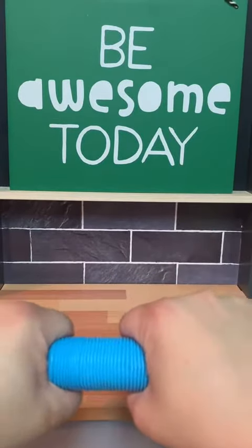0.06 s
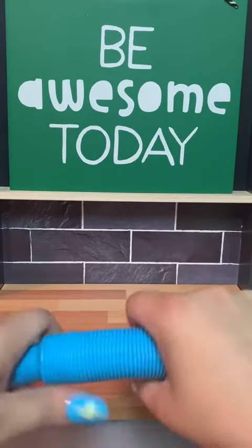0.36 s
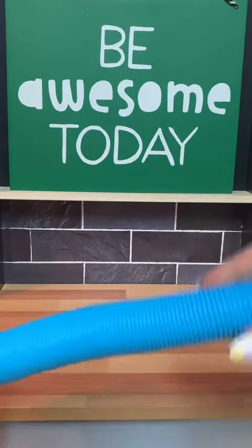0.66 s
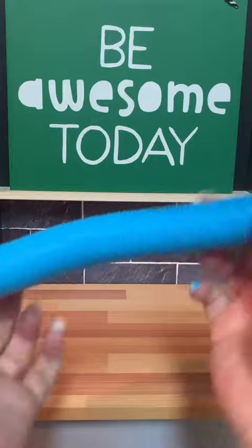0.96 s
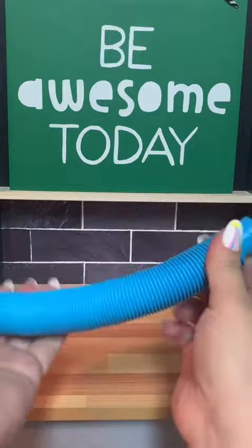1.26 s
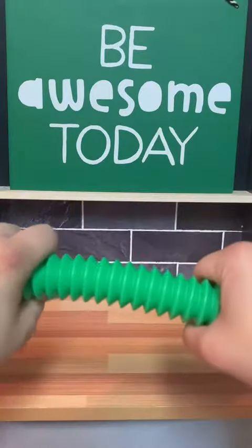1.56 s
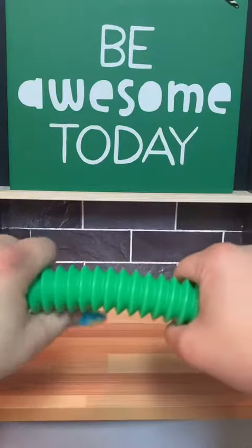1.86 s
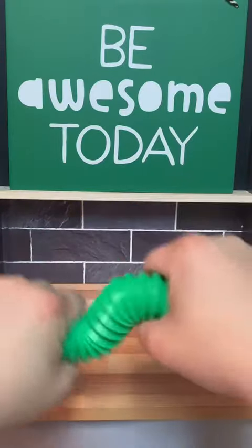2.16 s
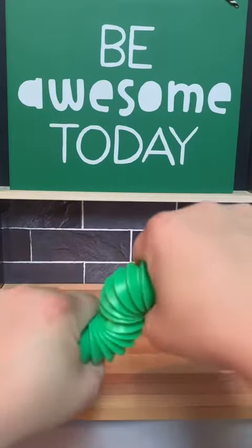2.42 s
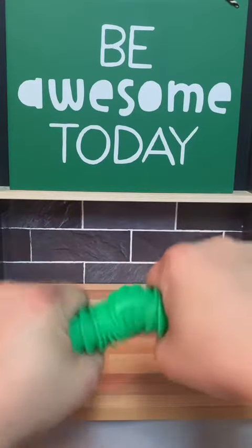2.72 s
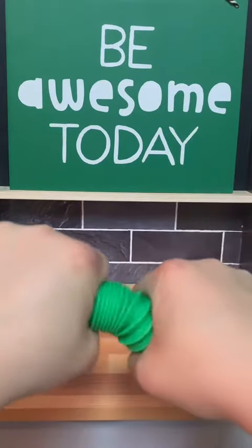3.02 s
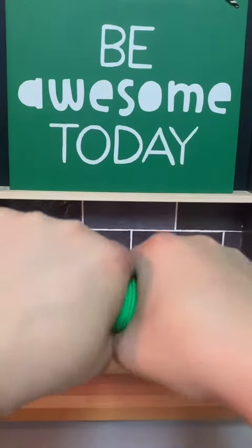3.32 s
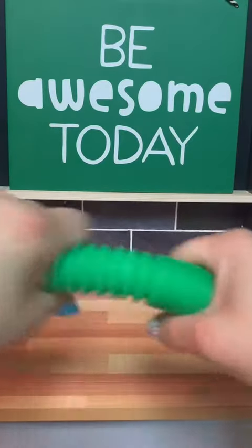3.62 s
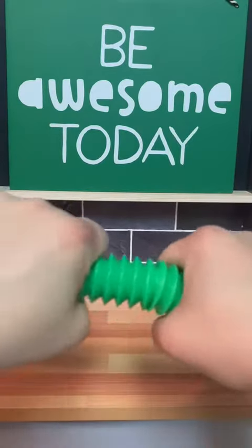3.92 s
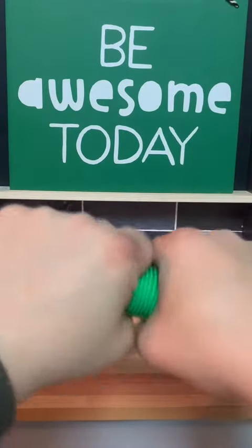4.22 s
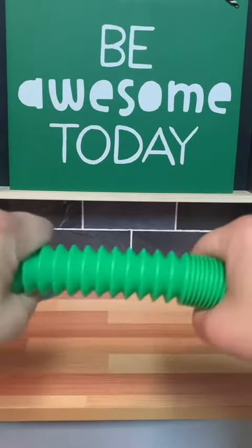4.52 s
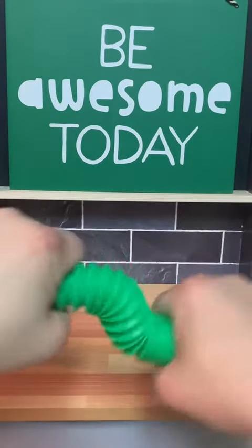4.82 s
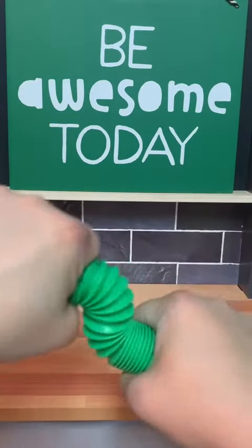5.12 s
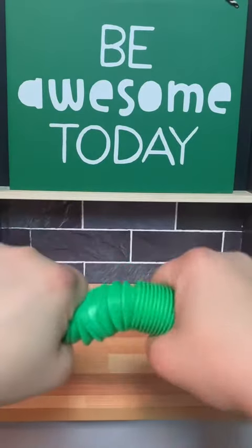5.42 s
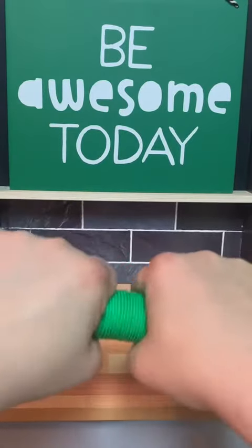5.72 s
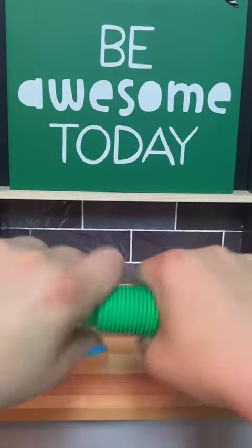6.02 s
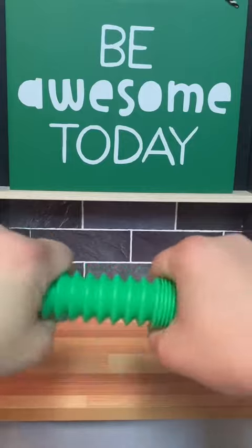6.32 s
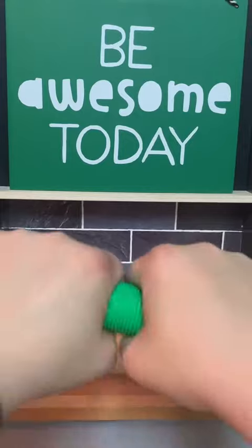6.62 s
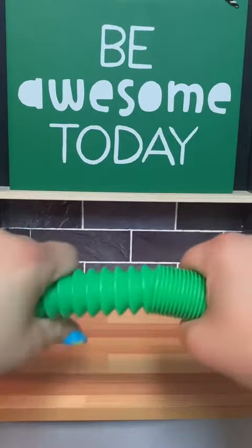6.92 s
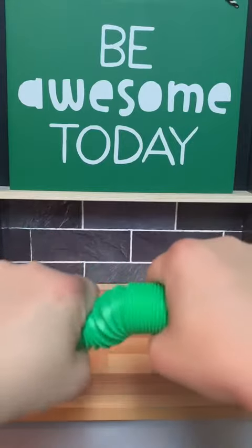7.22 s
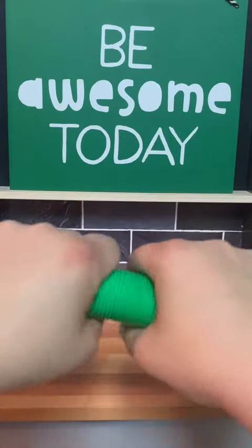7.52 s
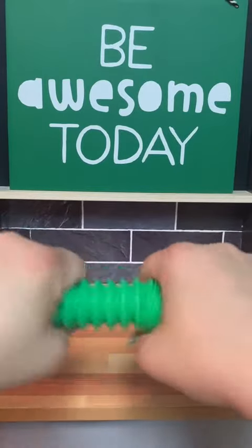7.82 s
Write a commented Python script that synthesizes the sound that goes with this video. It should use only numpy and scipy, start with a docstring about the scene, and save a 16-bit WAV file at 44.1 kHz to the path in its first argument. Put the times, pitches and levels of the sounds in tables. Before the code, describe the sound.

Hands pull and squash a ribbed plastic tube again and again, its soft zipping alternating with loud crackling snaps.

```python
"""Pop tubes, pulled and squeezed

Corrugated plastic tubes are worked by hand, close to a phone in a small, softly rumbling room.
Pulling gives a faint, ticking rasp. Squeezing flips the ribs one by one, each with a snap that races
through the wall as a bending wave and rings the air inside. The air note climbs as the tube shortens."""
import sys
import numpy as np
from scipy import signal
from scipy.fft import rfft, irfft, next_fast_len
from scipy.io import wavfile
from scipy.ndimage import uniform_filter1d

SR = 44100
rng = np.random.default_rng(int(sys.argv[2]) if len(sys.argv) > 2 else 0)


def dump(signal):
    """Clip the signal to [-1, 1] and save it as 16-bit WAV at the path in sys.argv[1]."""
    limited = np.clip(np.atleast_2d(signal).T, -1, 1)
    pcm = np.round(limited * 32767).astype(np.int16)
    wavfile.write(sys.argv[1], SR, pcm)


N = 355887
TIME = np.arange(N) / SR
LONG_TUBE_START_S, LONG_TUBE_END_S = 0.3, 1.2

# pulls and rubs that drag the ribs over each other: start_s, end_s, hiss_db, wall_db
PULL_STROKES = [(0, 0.036, -69, -56.5), (0.362, 0.615, -61.5, -65), (0.681, 0.771, -72, -67.5),
                (0.853, 1.084, -73, -74.5), (1.389, 1.523, -50, -67.5), (1.595, 1.697, -60, -70.5),
                (1.755, 1.898, -55.5, -69), (2.339, 2.362, -82, -50), (2.587, 2.74, -82, -57.5),
                (3.17, 3.42, -71.5, -74.5), (3.528, 3.68, -42, -49.5), (3.71, 3.783, -43.5, -49),
                (4.298, 4.478, -43.5, -54.5), (5.917, 6.015, -51, -49), (6.001, 6.157, -45, -54.5),
                (6.212, 6.301, -49.5, -53.5), (6.788, 6.872, -55.5, -55), (6.863, 6.991, -57, -62),
                (7.513, 7.717, -51, -58.5), (7.768, 7.857, -46, -53)]
# single ribs ticking open: start_s, crack_db, air_kick_db
OPENING_RIBS = [(0.294, -53.5, -85), (0.966, -63.5, -62.5), (1.0338, -64.5, -71), (3.308, -57.5, -80.5),
                (3.3813, -58.5, -79), (3.4574, -51.5, -70), (3.5589, -37, -43), (4.3433, -36.5, -52),
                (5.9472, -42, -39.5), (6.0632, -37.5, -46), (6.2435, -48.5, -46), (6.298, -42.5, -70),
                (6.8181, -40.5, -70), (6.8425, -32, -39), (7.6169, -40, -52), (7.7718, -46, -47.5),
                (7.8093, -46, -35.5)]
# ribs snapping shut: start_s, wall_db, centre_hz, air_kick_db
CLOSING_RIBS = [(2.089, -24, 2330, -41.5), (2.1036, -17.5, 2260, -21.5), (2.118, -18.5, 1450, -25.5),
                (2.1335, -16.5, 1160, -17.5), (2.155, -21.5, 1045, -15.5), (2.1767, -28, 1290, -19),
                (2.3736, -24.5, 890, -23.5), (2.5666, -39.5, 944, -34.5), (2.7062, -17, 2330, -26),
                (2.7278, -20, 2030, -46), (2.741, -21, 2070, -36.5), (2.7958, -17.5, 2340, -35.5),
                (2.8944, -23, 1990, -27), (2.9108, -18, 1775, -24.5), (3.0316, -18, 2200, -33.5),
                (3.0433, -21, 2560, -38), (3.0644, -22, 3630, -42), (3.0782, -27, 2440, -42),
                (3.098, -26.5, 1960, -35), (3.528, -31, 907, -33), (3.9501, -28.5, 1310, -28),
                (3.9731, -21.5, 1660, -26.5), (3.9842, -16, 1420, -26.5), (3.9966, -19.5, 1130, -35),
                (4.0018, -21.5, 1840, -40.5), (4.0159, -20.5, 1890, -34), (4.0279, -20, 2470, -45.5),
                (4.063, -20.5, 2430, -38.5), (4.071, -27, 2430, -43), (4.0862, -20.5, 3100, -46),
                (4.0905, -23.5, 2710, -42.5), (4.0987, -23, 2510, -34), (4.1028, -18.5, 2540, -41),
                (4.112, -29, 2060, -32), (4.7638, -21, 3560, -27.5), (4.7746, -22, 1600, -20.5),
                (4.7889, -16.5, 1330, -24), (4.8, -19, 1630, -15), (4.8089, -18.5, 1370, -19.5),
                (4.8209, -19, 1090, -14), (4.8282, -16.5, 1220, -20.5), (4.847, -19.5, 1040, -17),
                (4.8644, -22, 990, -28.5), (4.8714, -22.5, 830, -19), (5.219, -18.5, 1640, -22),
                (5.2493, -18, 2410, -20), (5.4452, -22.5, 980, -19), (5.5412, -19, 2694, -23),
                (5.6345, -21, 2600, -27.5), (5.652, -25, 2430, -31), (5.6617, -19.5, 2920, -32.5),
                (5.6726, -19, 1250, -41), (5.683, -23, 2520, -39), (6.4311, -21, 2260, -26),
                (6.4576, -19, 2010, -31.5), (6.47, -20.5, 2400, -25.5), (6.4806, -23.5, 2200, -22),
                (6.4871, -21.5, 2190, -28), (6.4974, -21.5, 1480, -20.5), (6.5285, -27.5, 1910, -35.5),
                (6.542, -27.5, 2800, -53.5), (6.555, -25, 2340, -41.5), (6.559, -19.5, 3060, -44.5),
                (6.576, -26, 2380, -47), (6.5828, -20, 2780, -42.5), (6.6031, -27, 2850, -36),
                (7.0737, -24.5, 3180, -31.5), (7.0974, -24.5, 1740, -30.5), (7.103, -34.5, 1940, -25),
                (7.2328, -23, 1865, -23), (7.2864, -33, 2760, -42), (7.291, -20.5, 2800, -37),
                (7.303, -30, 2610, -38), (7.312, -20.5, 2830, -35), (7.321, -23, 2340, -42),
                (7.329, -33, 2270, -32), (7.9161, -32, 1700, -29), (7.921, -23, 2110, -28.5),
                (7.9297, -20, 1600, -24), (7.9371, -19, 2070, -17.5), (7.9495, -22.5, 2980, -53),
                (7.9654, -22.5, 2940, -30), (7.9784, -31, 2960, -42)]
# ring-out of the plastic wall: freq_hz, t60_s
WALL_DECAY = [(300, 0.62), (1000, 0.094), (2500, 0.44), (6000, 0.067), (15000, 0.16)]
# fundamental of the air in the short tube: time_s, pitch_hz
AIR_PITCH = [(2.1, 212.3), (2.92, 221.4), (3.12, 232), (3.55, 249.2), (3.95, 243.5), (4.04, 270),
             (4.8, 287.5), (5.3, 293.5), (5.58, 300.3), (5.7, 313.2), (6.43, 306.7), (6.52, 348.2),
             (6.87, 335.4), (7.12, 358.7), (7.26, 365.4), (7.34, 398), (7.92, 380.6), (7.98, 425.3)]


def undb(db):
    """Decibels to gain."""
    return 10 ** (np.asarray(db) / 20)


def lookup(points, hz):
    """Read a table of freq_hz, value on a log-frequency axis."""
    f, value = np.transpose(points)
    return np.interp(np.log(np.maximum(hz, 1)), np.log(f), value)


def freqs(x):
    """Bin frequencies of the spectrum of x."""
    return np.fft.rfftfreq(x.shape[-1], 1 / SR)


def colour(x, points):
    """Minimum-phase EQ from a table of freq_hz, gain_db."""
    size = next_fast_len(x.shape[-1] + 2048) * 2
    gain = undb(lookup(points, np.fft.rfftfreq(size, 1 / SR)))
    cepstrum = irfft(np.log(gain))
    cepstrum[1:size // 2] *= 2
    cepstrum[size // 2 + 1:] = 0
    return irfft(rfft(x, size) * np.exp(rfft(cepstrum)))[..., :x.shape[-1]]


def unit(x):
    """Scale to rms 1."""
    return x / np.sqrt(np.mean(x ** 2))


def strike(x, db):
    """Scale a hit so that its first 6 ms have this rms level."""
    return x * undb(db) / np.sqrt(np.mean(x[..., :int(.006 * SR)] ** 2))


def stereo_noise(size, width):
    """White noise, mono at width 0 and fully wide at 1."""
    mid, side = rng.standard_normal((2, size))
    return unit(mid + width * side * np.array([[1], [-1]]))


def ring_out(noise, t60s):
    """Let each octave of a noise fade with its own decay time."""
    t, spectrum = np.arange(noise.shape[-1]) / SR, rfft(noise)
    centres = 125 * 2. ** np.arange(8)
    shares = [lookup(np.c_[centres, band], freqs(noise)) for band in np.eye(len(centres))]
    fades = [1000 ** (-t / lookup(t60s, hz)) for hz in centres]
    return sum(irfft(spectrum * share) * fade for share, fade in zip(shares, fades))


def add(out, x, start_s):
    """Mix x into out from start_s on."""
    i = int(start_s * SR)
    first, last = max(i, 0), min(i + x.shape[-1], out.shape[-1])
    out[..., first:last] += x[..., first - i:last - i]


def room_tone(rumble_trim_db=-0.5, hiss_db=-88):
    """A low, nearly mono rumble under a trace of hiss."""
    # spectrum of the rumble: freq_hz, gain_db
    rumble_eq = [(12, -44), (20, -12), (59, 4), (97, -1.5), (116, -9.5), (178, -17.5), (251, -18.5),
                 (333, -29.5), (435, -33), (536, -48.5), (700, -48), (910, -80.5), (1540, -120)]
    # its rise and fall: time_s, level_db
    rumble_ride = [(0.0, -56.5), (1.47, -53), (1.63, -48.5), (2.63, -50.5), (6.44, -48.5), (6.46, -54.5),
                   (7.4, -53), (8.0, -51.5)]
    level_db = np.interp(TIME, *np.transpose(rumble_ride)) + rumble_trim_db
    rumble = unit(colour(stereo_noise(N, 0.045), rumble_eq))
    return undb(level_db) * rumble + undb(hiss_db) * stereo_noise(N, 0.2)


def wall_ripple(f, spacing_hz, depth_db):
    """Random peaks and dips: the wall's resonances shift with every bend and grip."""
    knots = np.arange(0, SR, 250) * spacing_hz / 250
    return undb(depth_db * np.interp(f, knots, rng.standard_normal(len(knots))))


def rasps(edge_s=0.036, swell_db=2, swell_s=0.015, slip_db=2.5, slip_s=0.0012, size=16384):
    """Ribs scraping open in a dense, uneven run of tiny slips; every stroke has its own resonances."""
    # body of the scraped wall: freq_hz, gain_db
    wall_eq = [(200, -6.5), (600, -5), (1000, -10), (1800, -2.5), (3400, 0), (5000, -14), (8000, -18)]
    # friction hiss on top: freq_hz, gain_db
    hiss_eq = [(2500, -23.5), (4500, -12.5), (6000, -6), (8000, -8), (9500, -9), (11800, 1.5),
               (14000, -2.5), (16000, -7)]
    out = np.zeros((2, N))
    t = np.arange(size) / SR - .03  # pre-roll for the fade-in
    for start, end, hiss_db, wall_db in PULL_STROKES:
        length = end - start
        ramp = np.minimum(t, length - t) / min(edge_s, length / 3)
        stroke = np.clip(ramp / 2 + .5, 0, 1) ** 2
        grain = unit(uniform_filter1d(rng.standard_normal(size), int(slip_s * SR)))
        swell = unit(uniform_filter1d(rng.standard_normal(size), int(swell_s * SR)))
        slips = undb(slip_db * grain + swell_db * swell)
        for eq, db, width in (wall_eq, wall_db, .3), (hiss_eq, hiss_db, .8):
            layer = colour(slips * stereo_noise(size, width), eq)
            layer = irfft(rfft(layer) * wall_ripple(freqs(layer), spacing_hz=300, depth_db=3))
            add(out, undb(db) * stroke * unit(layer), start + t[0])
    return out


def crack(click=1.1, ring_db=-19, size=3072):
    """The sharp top of a flip: a click and a short spray of creases, coloured anew by each rib."""
    # average tone of the crack: freq_hz, gain_db
    crack_eq = [(2500, -19.5), (4600, -4.5), (5500, -2), (7500, -3.5), (9500, -9.5), (13000, -5.5),
                (16000, -6)]
    t = np.arange(size) / SR
    spray = stereo_noise(size, .7) * np.exp(-t / .004)
    spray += undb(ring_db) * ring_out(stereo_noise(size, 0.25), WALL_DECAY)
    spray[:, int(.0005 * SR)] += click
    hz = np.linspace(2500, 16000, 32)
    gain_db = lookup(crack_eq, hz) + 4 * rng.standard_normal(len(hz))
    return colour(spray, np.c_[hz, gain_db])


def ticks(wall_hz=2670, wall_trim_db=-7, loose_db=-2, scatter_db=3, per_pull=4):
    """Ribs ticking open, barely moving the wall: distinct ones, and a few at random in every pull."""
    out = np.zeros((2, N))
    for start, crack_db, _ in OPENING_RIBS:
        wall = strike(wall_wave(wall_hz, size=2048), crack_db + wall_trim_db)
        add(out, wall + strike(crack(size=2048), crack_db), start)
    for start, end, hiss_db, _ in PULL_STROKES:
        tick = strike(crack(size=1024), hiss_db + loose_db)
        for place, accent in zip(rng.random(per_pull), rng.standard_normal(per_pull)):
            add(out, undb(scatter_db * accent) * tick, start + (end - start) * place)
    return out


def rib_modes(centre_hz, t, count=4, t60_s=0.028):
    """A few short rings of the flipped rib, scattered around the wall's centre frequency."""
    hz = np.minimum(centre_hz * np.exp(.35 * rng.standard_normal((count, 1))), SR / 4)
    rings = np.sin(2 * np.pi * hz * t + rng.uniform(0, 2 * np.pi, (count, 1)))
    return unit(rings.sum(axis=0)) * 1000 ** (-t / t60_s)


def wall_wave(centre_hz, sweep_s=0.001806, q=0.64, low_hz=310, ring_db=-39, size=3072):
    """The body of a flip: a pulse and the wall's ring, spread into a falling chirp."""
    t = np.arange(size) / SR
    push = undb(-20) * stereo_noise(size, .2) * np.exp(-t / .0028)  # scatter among the ribs
    push += undb(-34) * rib_modes(centre_hz, t)
    push += undb(ring_db) * ring_out(stereo_noise(size, 0.13), WALL_DECAY)
    push[:, 0] += 1  # the pulse itself
    f = freqs(push) + 1
    body = wall_ripple(f, spacing_hz=260, depth_db=3.5) / (1 + 1j * q * (f / centre_hz - centre_hz / f))
    top_hz = min(4300, 3.1 * centre_hz)  # a soft, low flip has less treble too
    body /= np.sqrt(1 + (f / top_hz) ** 10) * np.sqrt(1 + (low_hz / f) ** 4)
    # bending waves speed up with the root of frequency, so the lows arrive late
    lag = np.exp(-4j * np.pi * sweep_s * np.sqrt(1000 * f) + 2j * np.pi * f * sweep_s / 4)
    fade_out = np.minimum(1, 4 - 4 * t / t[-1]) ** 2
    return irfft(rfft(push) * body * lag) * fade_out


def air_column(rasp, rub_db=-31, t60_s=0.22, damping=0.63, stretch=1.02, scatter_db=2, count=7):
    """Flips kick and rubbing stirs the air inside; its stretched harmonics follow the tube's length."""
    # how strongly the air modes reach out of the tube: freq_hz, gain_db
    radiation_eq = [(210, -11.5), (260, 0.5), (300, -0.5), (360, 3), (430, -0.5), (600, -5.5), (750, -7),
                    (950, -19), (1200, -12), (2200, -15.5)]
    pitch_hz = np.interp(TIME, *np.transpose(AIR_PITCH))
    phase = 2 * np.pi * np.cumsum(pitch_hz) / SR
    start_s, kick_db = np.transpose([(rib[0], rib[-1]) for rib in CLOSING_RIBS + OPENING_RIBS])
    onsets = (start_s * SR).astype(int)
    # pulled far out, the open ribs soak up part of the kick
    kick_db = kick_db + np.interp(pitch_hz[onsets], [215, 260], [-2, 0])
    # a rib's place along the tube decides how well it drives each overtone
    coupling = rng.standard_normal((len(onsets), count))
    out = np.zeros(N)
    for k in range(1, count + 1):
        drive = undb(rub_db) * rasp / k ** 2
        drive[onsets] += undb(kick_db + scatter_db * coupling[:, k - 1] * np.log(k))
        carrier = np.exp(1j * phase * k ** stretch)
        feedback = np.exp(-np.log(1000) * k ** damping / (t60_s * SR))  # overtones die sooner
        ring = carrier * signal.lfilter([1], [1, -feedback], drive / carrier)  # gliding resonator
        out += ring.imag * undb(lookup(radiation_eq, pitch_hz * k ** stretch))
    # the air note carries little bass below about 235 Hz
    return signal.sosfilt(signal.butter(2, 235, "high", fs=SR, output="sos"), out)


def long_tube(rasp, hollow_band_hz=(545, 655), hollow_db=6, sizzle_hz=10500, sizzle_db=3):
    """Pulled long, the first tube adds a hollow resonance and the sizzle of its fine ribs to the rasp."""
    rub = rasp * (TIME > LONG_TUBE_START_S) * (TIME < LONG_TUBE_END_S)
    hollow = signal.sosfilt(signal.butter(2, hollow_band_hz, "band", fs=SR, output="sos"), rub)
    sizzle = signal.sosfilt(signal.butter(2, sizzle_hz, "high", fs=SR, output="sos"), rub)
    return undb(hollow_db) * hollow + undb(sizzle_db) * sizzle


def snaps(crack_trim_db=-6, rebound_db=-13, rebound_range_s=(0.002, 0.008)):
    """Every rib that snaps shut, and its weaker rebound a moment later."""
    out = np.zeros((2, N))
    for start, wall_db, centre_hz, _ in CLOSING_RIBS:
        air_hz = np.interp(start, *np.transpose(AIR_PITCH))
        stiff_db = 6 * np.log2(centre_hz / 2000)  # a stiffer, higher rib cracks harder
        packed_db = 5 * np.log2(air_hz / 300)  # and so does a tightly packed tube
        crack_db = wall_db + crack_trim_db + stiff_db + packed_db
        snap = strike(wall_wave(centre_hz), wall_db) + strike(crack(), crack_db)
        add(out, snap, start)
        add(out, undb(rebound_db) * snap, start + rng.uniform(*rebound_range_s))
    return out


def room_reverb(x, early_db=-13, early_decay_s=0.0098, late_db=-23, size=16384):
    """Quick reflections from the table and backboard, then the faint tail of the room."""
    # tone of the reflections: freq_hz, gain_db
    room_eq = [(100, -2.5), (300, 9.5), (700, 10), (1500, 9), (4000, 1), (8000, 2.5), (15000, -11)]
    # length of the tail: freq_hz, t60_s
    room_decay = [(200, 0.3), (1000, 0.3), (4000, 0.33), (15000, 0.45)]
    t = np.arange(size) / SR
    early = stereo_noise(size, 0.34) * np.exp(-t / early_decay_s) * (t > .002)
    late = ring_out(stereo_noise(size, 1.0), room_decay) * (t > .01)
    response = colour(undb(early_db) * unit(early) + undb(late_db) * unit(late), room_eq) / np.sqrt(size)
    return signal.fftconvolve(x[None], response, axes=1)[:, :N]


def stereo_spread(x):
    """The two microphone ports agree more in some bands than in others."""
    # stereo width by band: freq_hz, side_gain_db
    side_eq = [(100, 6), (250, -2.5), (550, 3), (1000, 3.5), (2000, 2), (4200, -6.5), (8000, -4),
               (13000, 1.5)]
    mid, side = x.mean(axis=0), (x[0] - x[1]) / 2
    return mid + colour(side, side_eq) * np.array([[1], [-1]])


def scene():
    """The tubes in their room: rubbing sounds the long tube's hollow and the short tube's air note."""
    rasp = rasps()
    short_tube_rasp = rasp.mean(axis=0) * (TIME >= LONG_TUBE_END_S)
    tubes = snaps() + ticks() + rasp + long_tube(rasp) + air_column(short_tube_rasp)
    return stereo_spread(tubes + room_reverb(tubes.mean(axis=0))) + room_tone()


def record(dry):
    """The phone colours the sound, clips at full scale and cuts the top."""
    # microphone response: freq_hz, gain_db
    mic_eq = [(30, -6), (80, 3), (750, 3.5), (1000, 0.5), (2400, -0.5), (4200, 4.5), (4650, -5), (4950, -2),
              (5400, 4.5), (11000, 5), (16000, -4.5)]
    high_cut = signal.ellip(8, .2, 70, 16100, fs=SR, output="sos")
    return signal.sosfilt(high_cut, np.clip(colour(dry, mic_eq), -1, 1))


dry = scene()
out = record(dry)
dump(out)
```